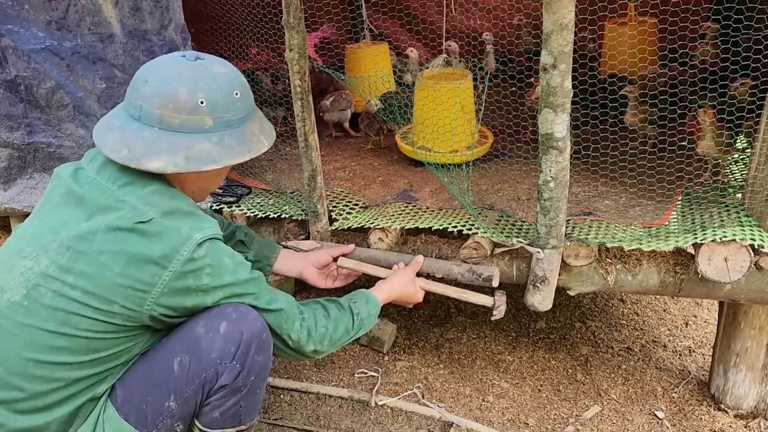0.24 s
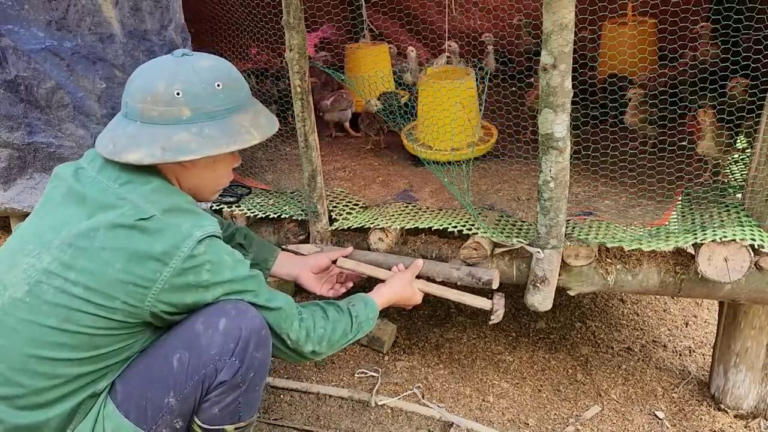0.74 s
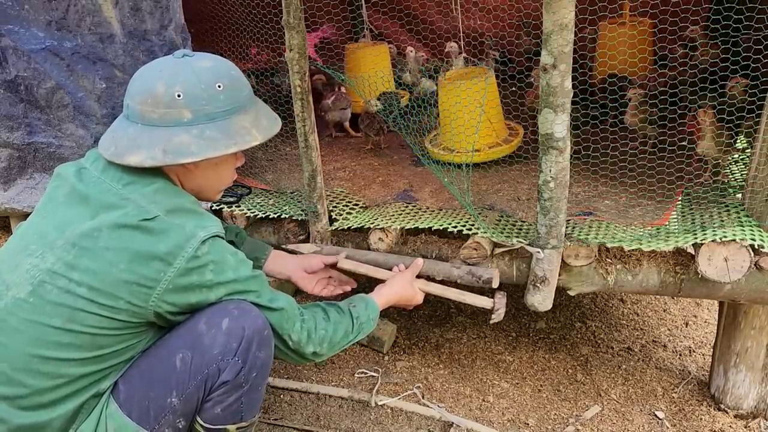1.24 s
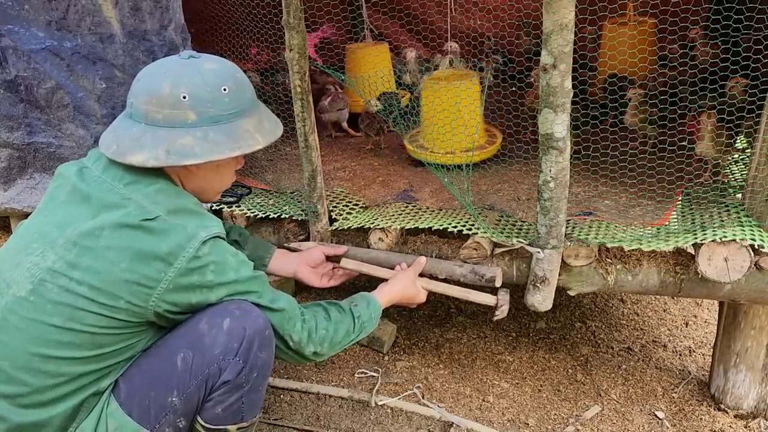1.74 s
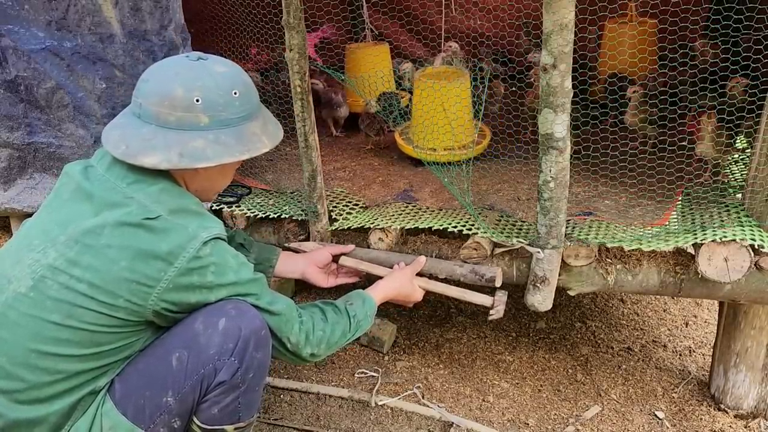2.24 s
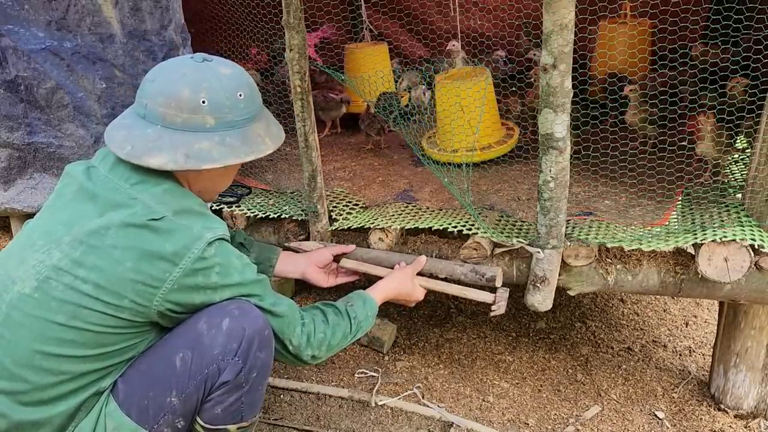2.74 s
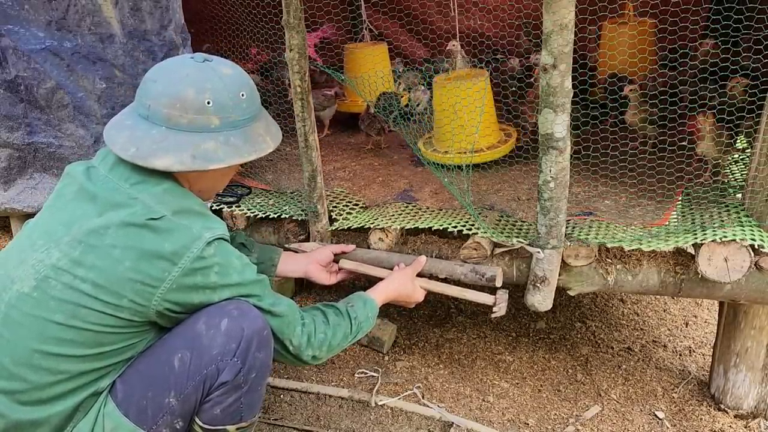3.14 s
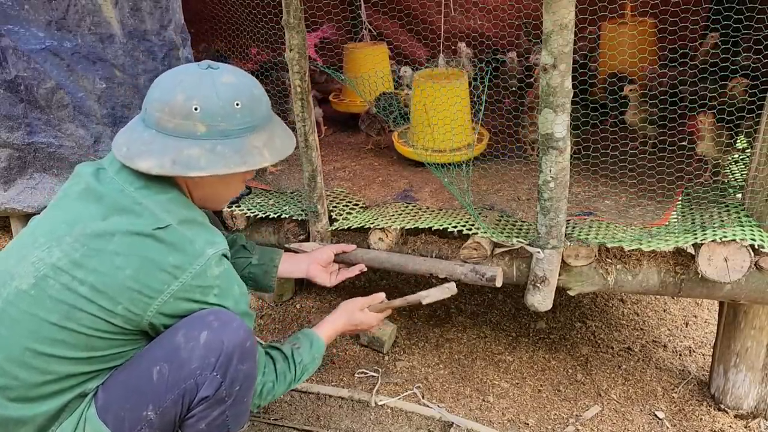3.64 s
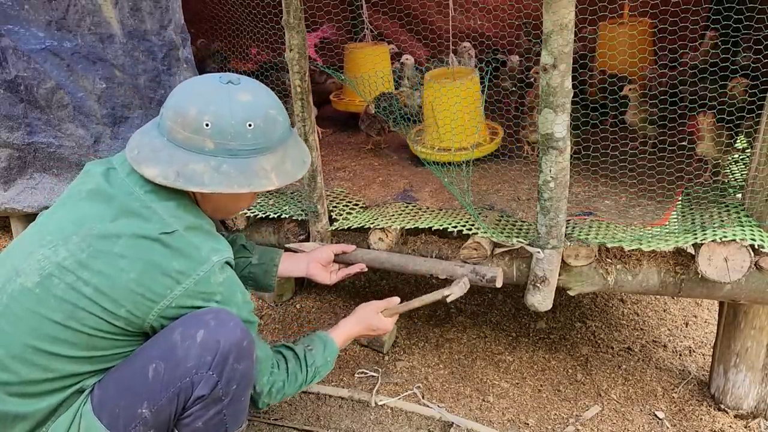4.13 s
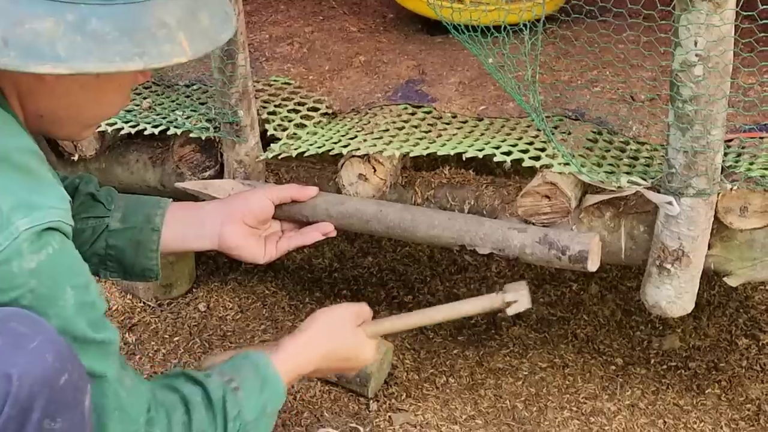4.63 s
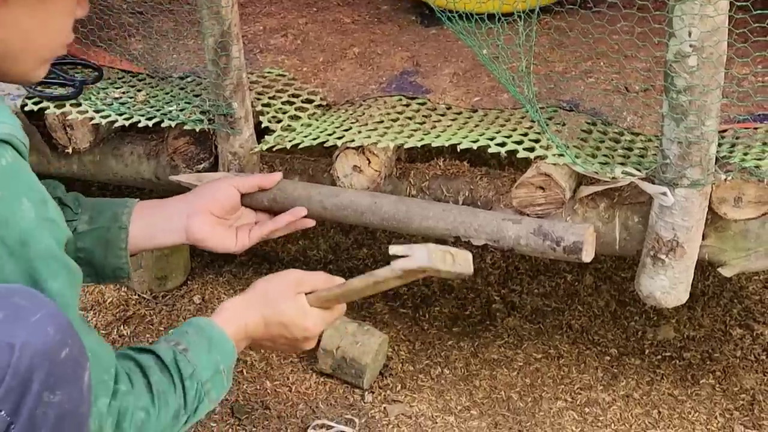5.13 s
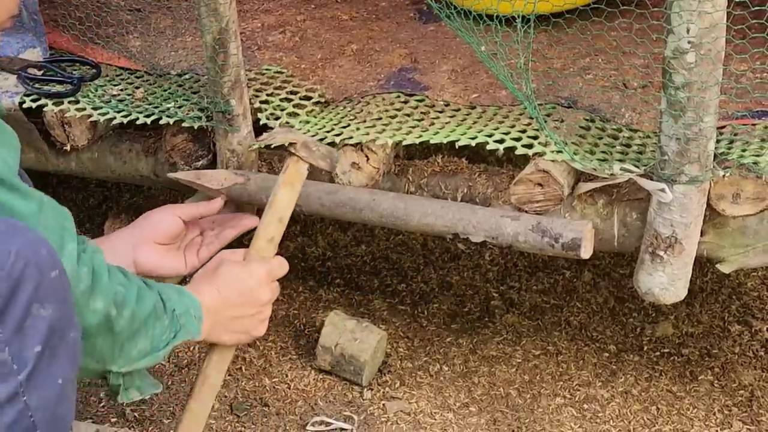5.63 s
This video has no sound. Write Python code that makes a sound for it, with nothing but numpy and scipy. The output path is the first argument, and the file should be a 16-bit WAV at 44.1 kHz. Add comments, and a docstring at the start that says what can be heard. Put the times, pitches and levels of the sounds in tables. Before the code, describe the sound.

Young chickens cheep and peck at a hollow plastic feeder outdoors, then a steel hammer hits a wooden stake three times, the last clipped short.

```python
"""Open chicken coop: young birds cheep and peck at a hollow plastic feeder, a couple of metres from a phone.
A steel hammer drives a wooden stake three times close by; the third blow is cut off short. Cheeps are sliding
whistles; pecks, feet on the slats and hammer blows are knocked modes. Squawks, shuffling feet, a tick on one
peck and cloth rustling near the end are filtered grains; the outdoor air is noise in flickering bands."""
import sys
import numpy as np
from scipy import signal
from scipy.io import wavfile
from scipy.ndimage import uniform_filter1d

SR = 44100
rng = np.random.default_rng(int(sys.argv[2]) if len(sys.argv) > 2 else 0)


def store_pcm(level_fs):
    """Save levels as 16-bit WAV."""
    pcm = np.round(np.clip(level_fs, -1, 1) * 32767).astype(np.int16)
    wavfile.write(sys.argv[1], SR, np.atleast_2d(pcm).T)


def undo_db(level):
    """Turn decibels back into plain size, where 20 dB means ten times bigger."""
    steps = np.asarray(level, float) / 20
    return 10 ** steps


N = 259308

# Modes of the slatted floor. Each row: nominal frequency in Hz, relative level in dB, t60 in seconds.
SLAT_MODES = [(116, 1, .075), (165, 4, .065)]


def decay(t60_s, seconds):
    """Exponential fall of 60 dB in t60_s."""
    return np.exp(-np.log(1000) * np.arange(int(seconds * SR)) / SR / t60_s)


def add(out, start_s, sound, pan_db=0., lag=0):
    """Mix in a sound: positive pan_db favours the left; lag in samples delays the left, or the right if negative."""
    sound = np.broadcast_to(sound, (2, sound.shape[-1]))
    for ch, sign in enumerate((1, -1)):
        i = max(int(start_s * SR), 0) + max(sign * lag, 0)
        n = max(min(sound.shape[1], N - i), 0)
        out[ch, i:i + n] += sound[ch, :n] * undo_db(sign * pan_db / 2)


def band(x, lo_hz, hi_hz):
    """Band-pass to unit rms."""
    sos = signal.butter(2, [lo_hz, min(hi_hz, 19000)], "band", fs=SR, output="sos")
    y = signal.sosfilt(sos, x)
    return y / y.std()


def walk(rate_hz):
    """Smooth random level, spread near 1."""
    k = int(SR / rate_hz)
    steps = np.repeat(rng.standard_normal(N // k + 1), k)
    return 2.08 * uniform_filter1d(uniform_filter1d(steps, k), k)[:N]


def ring(modes, push_s, scatter_db, seconds=.4, tail_db=-60):
    """Damped modes set off by a knock and the chatter after it, each call scattered in pitch and level; peak 1."""
    t = np.arange(int(seconds * SR)) / SR
    y = np.zeros(len(t))
    for hz, db, t60_s in modes:
        level_chance, pitch_chance = rng.standard_normal(2)
        tone = np.sin(2 * np.pi * hz * (1 + 0.0042 * pitch_chance) * t)
        fall = decay(t60_s, seconds) + undo_db(tail_db) * decay(6.7 * t60_s, seconds)
        y += undo_db(db + scatter_db * level_chance) * tone * fall
    push = 0.037 * rng.standard_normal(600) ** 3 * np.exp(-np.arange(600) / SR / push_s)
    push[0] = 1  # the knock itself
    y = signal.fftconvolve(y, push)[:len(t)]
    return y / np.abs(y).max()


def burst(length_s, lo_hz, hi_hz, grain_db=5.5):
    """Dense small clicks in uneven bursts, band-passed twice."""
    n = int(length_s * SR)
    grain_level_db = grain_db * rng.standard_normal(n // 200 + 1).repeat(200)[:n]
    clicks = rng.standard_normal((2, n)) * undo_db(grain_level_db)
    return band(band(clicks, lo_hz, hi_hz), lo_hz, hi_hz) * signal.windows.tukey(n, .3)


def air(db):
    """Outdoor hush in half-octave bands that flicker; the bass is alike left and right."""
    # Spectrum of the hush. Each row: frequency in Hz, relative level per Hz in dB.
    colour = [(30, -2.5), (120, -10), (340, -18.5), (1400, -20), (4400, -20), (7300, -23), (10000, -38),
              (16000, -30.5)]
    hz, colour_db = np.transpose(colour)
    out = 0
    for centre_hz in 35 * 2 ** np.arange(0, 9, .5):
        mid, side = band(rng.standard_normal((2, N)), centre_hz / 1.186, centre_hz * 1.265)
        level_db = np.interp(np.log(centre_hz), np.log(hz), colour_db) + 10 * np.log10(centre_hz / 9000)
        flicker_db = (3.5 if centre_hz < 1500 else 1.2) * walk(12)
        width = min(0.086 + centre_hz / 1500, 1)
        stereo = mid + width * side * np.array([[1], [-1]])
        out = out + undo_db(level_db + flicker_db) * stereo
    return out * undo_db(db)


def cheep(length_s, start_hz, fall_khz_s):
    """A ragged whistle sliding in uneven steps, its loudness breaking up, with a faint second harmonic."""
    lowest_hz = 1816  # the slide levels off here, before the wobble
    u = np.linspace(0, 1, int(length_s * SR))
    knots = rng.standard_normal((2, 40))
    wobble, flutter = (np.interp(u * length_s * 125, np.arange(40), k) for k in knots)
    slide_hz = start_hz - 1000 * fall_khz_s * length_s * u ** 1.45
    hz = np.maximum(slide_hz, lowest_hz) + 110 * wobble
    phase = 2 * np.pi * np.cumsum(hz) / SR
    breath = np.sin(np.pi * u ** 1.13) ** 0.37 * undo_db(5.2 * uniform_filter1d(flutter, size=100))
    return breath * (np.sin(phase) + undo_db(-21) * np.sin(2 * phase))


def flock(background_db):
    """Near birds' sliding whistles, and a crowd of fainter ones behind them."""
    # Near cheeps. Each row: start in seconds, length in seconds, start pitch in Hz, mean fall in kHz/s, level in dB.
    near_cheeps = [(0.116, 0.07, 3590, 15, -51), (0.255, 0.064, 2980, 7.5, -49.5),
                   (0.335, 0.065, 3460, 21, -47), (0.405, 0.084, 3010, 8.5, -43),
                   (0.489, 0.073, 2920, 9.5, -51.5), (0.59, 0.087, 4205, 19.5, -49.5),
                   (0.894, 0.097, 4376, 11.5, -52.5), (1.106, 0.12, 3370, 13, -46),
                   (1.212, .14, 4050, 10.5, -50), (1.244, 0.077, 2445, 8.5, -50),
                   (1.249, 0.09, 3700, 12.5, -46), (1.352, 0.048, 2230, 6.5, -52.5),
                   (1.42, .11, 4800, 25, -49.5), (1.775, 0.084, 3680, 14, -58),
                   (1.886, .055, 3010, 8.5, -51), (1.879, 0.049, 4240, 4, -51.5),
                   (1.994, 0.062, 3110, 7.5, -48.5), (2.067, 0.067, 3000, 1, -52),
                   (2.189, 0.045, 2150, -3, -47), (2.248, 0.065, 3310, 11.5, -50.5),
                   (2.331, 0.07, 2170, 5.5, -46), (2.464, 0.097, 4370, 17.5, -57.5),
                   (2.584, 0.15, 3350, 6.5, -51.5), (2.681, 0.11, 4970, 26, -52),
                   (2.903, 0.052, 2130, 6.5, -48.5), (2.975, 0.13, 3650, 17, -49),
                   (3.145, 0.097, 2453, 9, -48), (3.215, 0.048, 3020, 6, -43),
                   (3.245, 0.0686, 2360, 10, -46.5), (3.313, 0.061, 2473, 9.5, -46.5),
                   (3.46, 0.072, 2160, 4.5, -53), (3.722, 0.039, 2256, 14.5, -37),
                   (3.831, 0.049, 3120, 16, -40), (3.874, 0.059, 1830, 7, -47.5),
                   (4.211, .05, 3300, 4, -53), (4.35, 0.082, 3505, 6, -48.5),
                   (4.723, 0.06, 3950, 17.5, -53), (5.119, 0.079, 2900, 15.5, -52),
                   (5.241, 0.1, 3960, 9.5, -50.5), (5.27, 0.04, 3000, 16, -48.5),
                   (5.413, 0.038, 3183, 10, -45), (5.463, 0.099, 3920, 23, -53),
                   (5.783, 0.051, 2280, 11.5, -44.5)]
    near, far = np.zeros((2, N)), np.zeros((2, N))
    for start_s, length_s, start_hz, fall_khz_s, db in near_cheeps:
        side = rng.standard_normal()
        add(near, start_s, undo_db(db) * cheep(length_s, start_hz, fall_khz_s), -1 + 3 * side, int(-4 * side))
    lowest_start_hz, spread_hz = 2552, 1850
    slow_khz_s, fast_khz_s = 2.09, 18
    for when, top, fall, span, size, side in rng.uniform(size=(640, 6)):
        start_hz = lowest_start_hz + spread_hz * top
        fall_khz_s = slow_khz_s + (fast_khz_s - slow_khz_s) * fall
        far_cheep = cheep(0.0404 + .06 * span, start_hz, fall_khz_s)
        add(far, when * N / SR, undo_db(-1.5 - 9 * size) * far_cheep, 8 * side - 5, int(16 * side - 8))
    return near + far * undo_db(background_db)


def pecks(background_db):
    """A beak clicks on the plastic wall; the hollow inside booms a moment later."""
    # Clear pecks. Each row: start in seconds, click level in dB, boom level over the click in dB.
    clear = [(0.086, -35.5, -3), (0.164, -42, -2), (0.387, -40.5, -4), (0.735, -41, -3), (0.904, -41.5, -9),
             (1.14, -40.5, -10), (1.451, -32, -5), (1.655, -36.5, -17), (1.867, -43, -21),
             (1.94, -35.5, -4.5), (1.992, -40, 3), (2.095, -49, 5.5), (2.31, -43.5, -1.5), (2.387, -38, -6),
             (2.665, -38.5, -6), (2.867, -43, -1), (3.154, -36.5, -10.5), (3.644, -39, -6),
             (4.449, -43.5, -2), (5.392, -30, -14)]
    # Feeder wall modes. Each row: nominal frequency in Hz, relative level in dB, t60 in seconds.
    wall_modes = [(1200, 10, 0.0056), (1445, 1, 0.0094)]
    # Air inside the feeder. Each row: nominal frequency in Hz, relative level in dB, t60 in seconds.
    hollow_modes = [(431, 9.5, 0.025)]
    boom_late_s, faint_boom_db = 0.00296, -5
    faint = []
    for when, size in rng.uniform(size=(110, 2)):
        faint.append((when * N / SR, background_db[int(when * N)] + 9 - 12 * size, faint_boom_db))
    out = np.zeros((2, N))
    for start_s, db, boom_db in list(clear) + faint:
        add(out, start_s, undo_db(db) * ring(wall_modes, 0.015, 3.3, .08), 1, 3)
        boom = ring(hollow_modes, 0.0042, 1.5, 0.16)
        add(out, start_s + boom_late_s, undo_db(db + boom_db) * boom, .7)
    return out


def tick_and_rustles():
    """One bright tick on top of a peck, then rustling cloth near the end: bright uneven grains."""
    # The tick, then the rustles. Each row: start in seconds, length in seconds, level in dB.
    rows = [(.165, 0.0025, -47), (5.53, 0.19, -57), (5.775, 0.045, -51)]
    out = np.zeros((2, N))
    for start_s, length_s, db in rows:
        add(out, start_s, undo_db(db) * burst(length_s, 3700, 14700))
    return out


def thuds():
    """Feet landing set off the low modes of the slats."""
    # Each row: start in seconds, level in dB.
    rows = [(0.176, -42), (1.735, -38.5), (1.767, -37.5), (4.292, -46.5), (4.794, -38.5), (5.388, -38)]
    out = np.zeros((2, N))
    for start_s, db in rows:
        add(out, start_s, undo_db(db) * ring(SLAT_MODES, 0.00086, 0.46, .2), 1)
    return out


def squawks():
    """A noisy rasp over a low croak that throbs."""
    # Each row: start in seconds, length in seconds, level in dB.
    rows = [(3.17, .19, -49.5), (3.716, 0.054, -50.5)]
    croak_db, throb_hz, throb_depth_db = -5, 41, 7
    out = np.zeros((2, N))
    for start_s, length_s, db in rows:
        rasp = burst(length_s, 1700, 4000, grain_db=2.5)
        croak = burst(length_s, 1350, 1750, grain_db=2.5)
        throb_db = throb_depth_db * np.sin(2 * np.pi * throb_hz * np.arange(rasp.shape[1]) / SR)
        add(out, start_s, undo_db(db) * (rasp + undo_db(croak_db + throb_db) * croak))
    return out


def shuffles():
    """Feet shuffling in the litter: uneven grains, duller than the cloth."""
    # Each row: start in seconds, length in seconds, level in dB.
    rows = [(3.64, 0.1, -54.5), (5.05, .8, -56)]
    out = np.zeros((2, N))
    for start_s, length_s, db in rows:
        add(out, start_s, undo_db(db) * burst(length_s, 148, 2570))
    return out


def strike(wood_db, steel_db, rattle_db, rattle_t60_s, jolt_db):
    """Stake and head ring, loose chatter keeps both ringing, and the frame takes the jolt."""
    # Wooden stake modes. Each row: nominal frequency in Hz, relative level in dB, t60 in seconds.
    stake_modes = [(1480, 2, .015), (1600, 4, .032), (1900, 2, .03), (2410, 2, .07), (1100, -6, .035),
                   (520, -11, .04)]
    # Steel head modes. Each row: nominal frequency in Hz, relative level in dB, t60 in seconds.
    head_modes = [(4365, -6, .06), (4500, -6, .06), (4650, 4, .018), (5470, -8, .06), (5300, 4, .02),
                  (3500, -11, .055), (6300, -6, .045)]
    contact_s = .0008
    out = np.zeros((2, N))
    add(out, 0.0024, undo_db(jolt_db) * ring(SLAT_MODES, 0.0062, 2.97), 3.5)
    stake = ring(stake_modes, .00003, 1, tail_db=-40)
    head = ring(head_modes, .00003, 1, tail_db=-29)
    n = len(stake)
    bite = np.minimum(np.arange(n) / SR / contact_s, 1)
    add(out, 0, undo_db(wood_db) * stake * bite, 3.5, -2)
    add(out, 0, undo_db(steel_db) * head * bite, 1.5, -3)
    noise = rng.standard_normal((3, n))
    grain_level_db = 2 * rng.standard_normal(300).repeat(60)[:n]
    grains = (noise[0] + 0.98 * noise[1:]) * undo_db(grain_level_db)  # partly alike left and right
    dying = decay(rattle_t60_s, .4)
    body = undo_db(wood_db) * stake + undo_db(steel_db) * head
    rung = signal.fftconvolve(grains * dying, body[None], axes=1)[:, :n]
    low = 0.85 * band(grains, 184, 7750)
    high = 0.1 * band(grains, 7450, 11800) * decay(0.82, .4)
    rattle = (low + high) * dying
    add(out, 0, undo_db(rattle_db) * (rattle + 2.37 * rung / np.abs(rung).max()), 2)
    return out[:, :n]


def hammer():
    """Steel meets wood with a crack; the head drops back once, softer and crackless, after the first two blows."""
    # Blows. Each row: start in seconds, then levels in dB of wood, steel, rattle and jolt through the frame.
    blows = [(4.0549, 3, -1, -25, -36), (4.5314, -9, 5, -24, -26.5), (5.0118, -12, 6, -21, -20)]
    # Head dropping back on the stake. Each row: start in seconds, then levels in dB of wood, rattle and jolt.
    bounces = [(4.088, -18, -50, -49), (4.569, -17, -30, -25.5)]
    crack_db, blow_rattle_t60_s = -12, 0.18
    bounce_steel_over_wood_db, bounce_rattle_t60_s = -3, 0.12
    cut_s, cut_fade_s = 5.0225, 0.0018  # the third blow is silent from cut_s
    out = np.zeros((2, N))
    for start_s, wood_db, steel_db, rattle_db, jolt_db in blows:
        add(out, start_s, strike(wood_db, steel_db, rattle_db, blow_rattle_t60_s, jolt_db))
        crack = band(rng.standard_normal(int(.05 * SR)), 1370, 15500) * decay(0.0086, .05)
        add(out, start_s, undo_db(crack_db) * crack, 2.5, -2)
    for start_s, wood_db, rattle_db, jolt_db in bounces:
        steel_db = wood_db + bounce_steel_over_wood_db
        add(out, start_s, strike(wood_db, steel_db, rattle_db, bounce_rattle_t60_s, jolt_db))
    return out * np.clip((cut_s - np.arange(N) / SR) / cut_fade_s, 0, 1)


def coop_echo(inside):
    """Sparse decaying returns off posts and roof, none in the first 150 samples."""
    echo = rng.standard_normal((2, int(.3 * SR))) ** 3 * decay(0.1, .3)
    echo[:, :150] = 0
    echo *= undo_db(-4) / np.linalg.norm(echo, axis=1, keepdims=True)
    return signal.fftconvolve(inside, echo, axes=1)[:, :N]


def scene():
    """Birds, feeder and thuds echo under the coop's roof; the hammer is out in front, dry."""
    # Background level: far birds, faint pecks and hush sink together after the hammer blows.
    # Each row: time in seconds, level in dB.
    background = [(0, -51.5), (.65, -56), (1.05, -58), (1.6, -55), (4.0, -56.5), (4.2, -62.5),
                  (4.95, -66.5), (5.1, -61), (5.88, -57.5)]
    background_db = np.interp(np.arange(N) / SR, *np.transpose(background))
    inside = flock(background_db) + pecks(background_db) + thuds()
    hush = air(-29.5 + .28 * background_db)  # moves less than the birds
    return inside + coop_echo(inside) + hush + tick_and_rustles() + squawks() + shuffles() + hammer()


def top_cut(x):
    """Nothing passes above the cut-off."""
    return signal.sosfilt(signal.butter(12, 16820, fs=SR, output="sos"), x)


def record(dry):
    """The phone's microphones lose the deep bass and the very top."""
    thin = signal.sosfilt(signal.butter(2, 70, "high", fs=SR, output="sos"), dry)
    dull = signal.sosfilt(signal.butter(12, 15700, fs=SR, output="sos"), thin)
    return top_cut(dull)


dry = scene()
out = record(dry)
store_pcm(out)
```